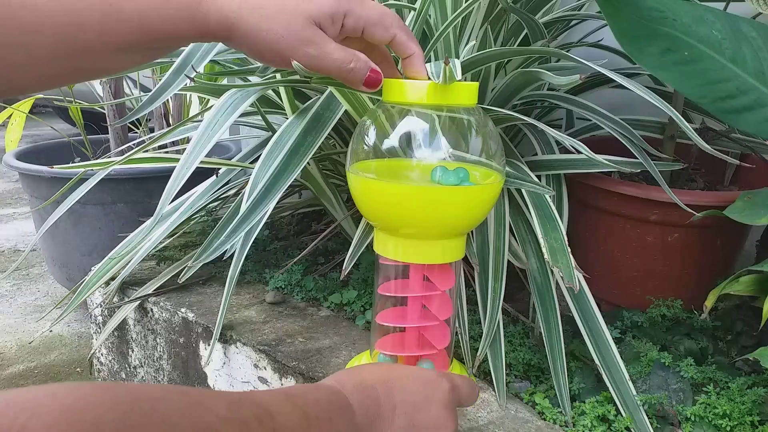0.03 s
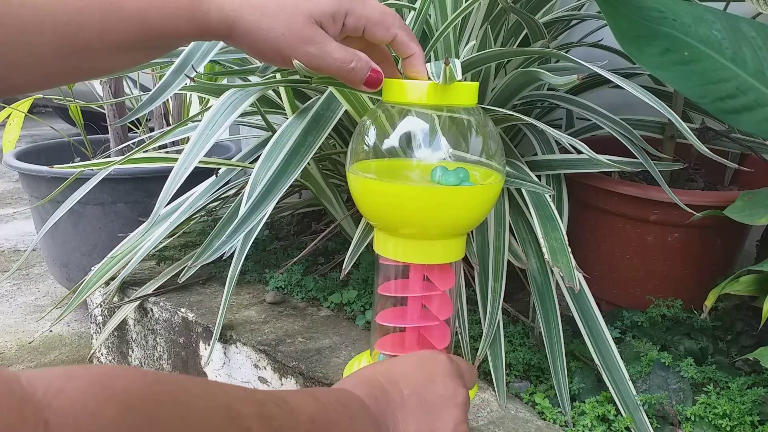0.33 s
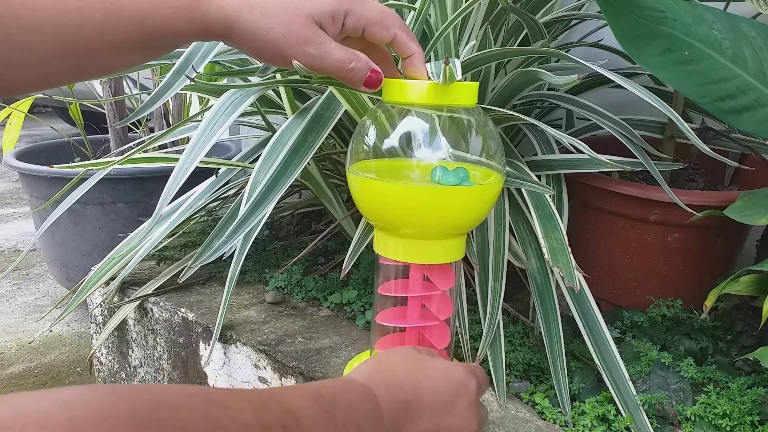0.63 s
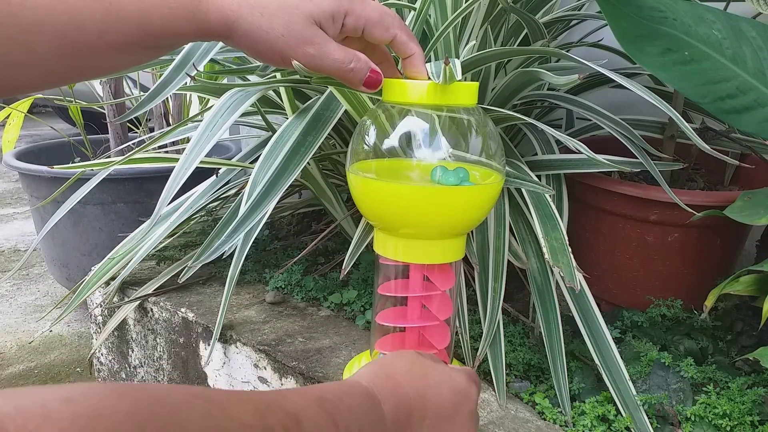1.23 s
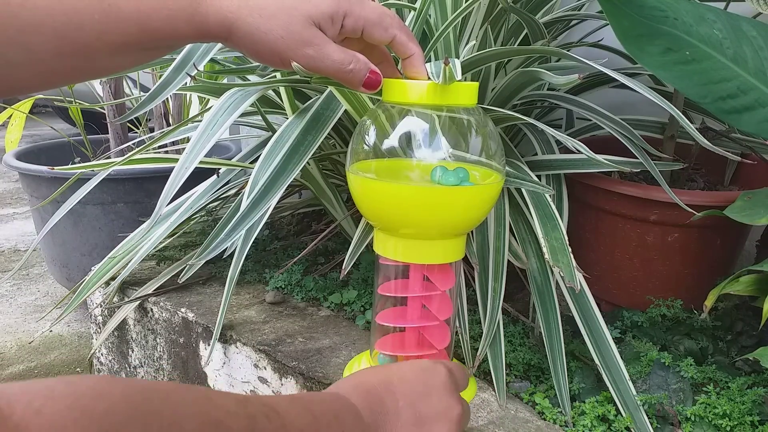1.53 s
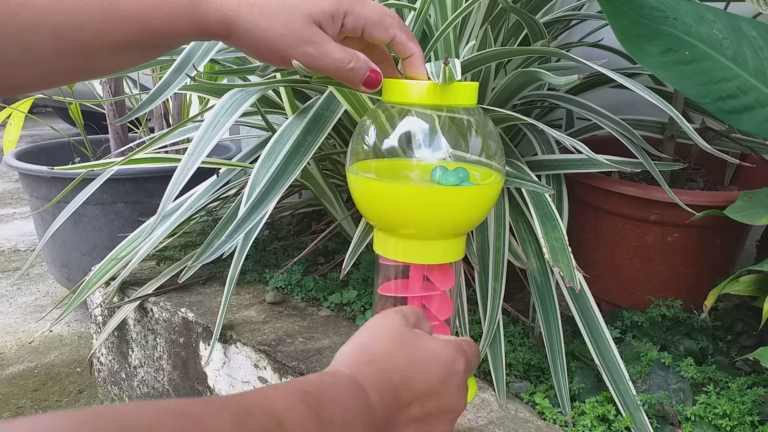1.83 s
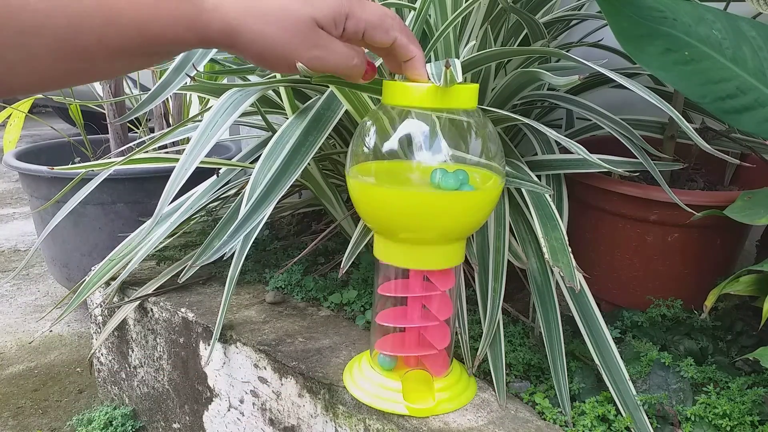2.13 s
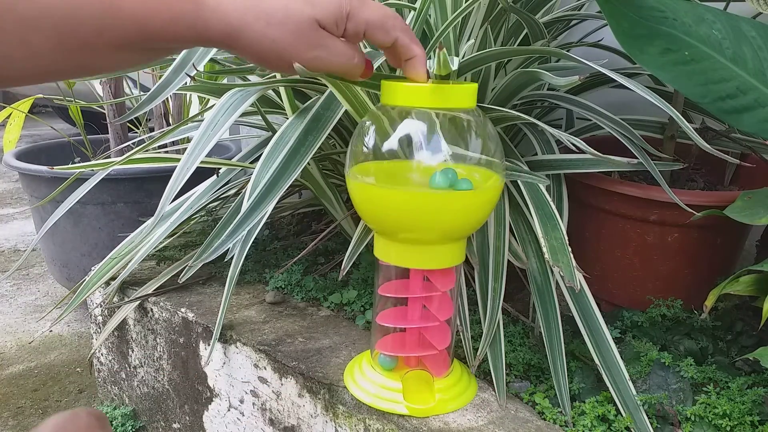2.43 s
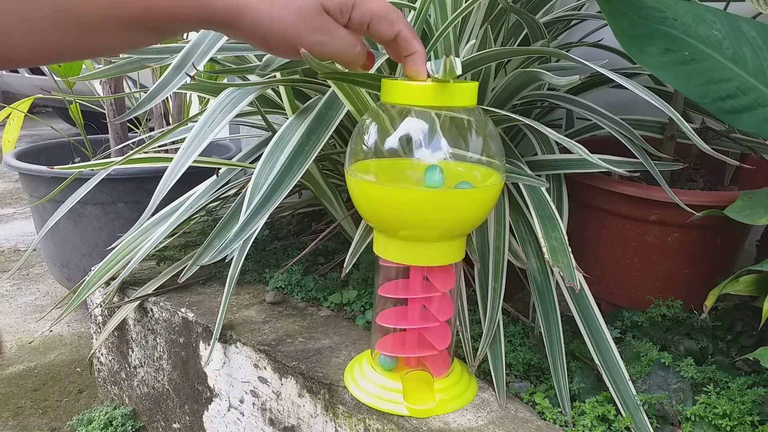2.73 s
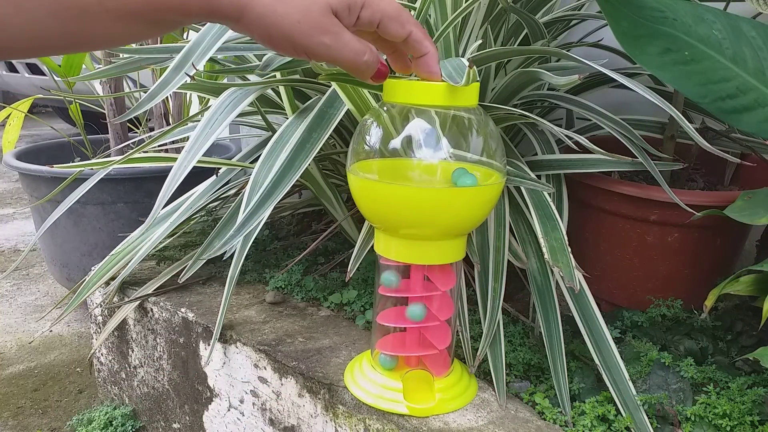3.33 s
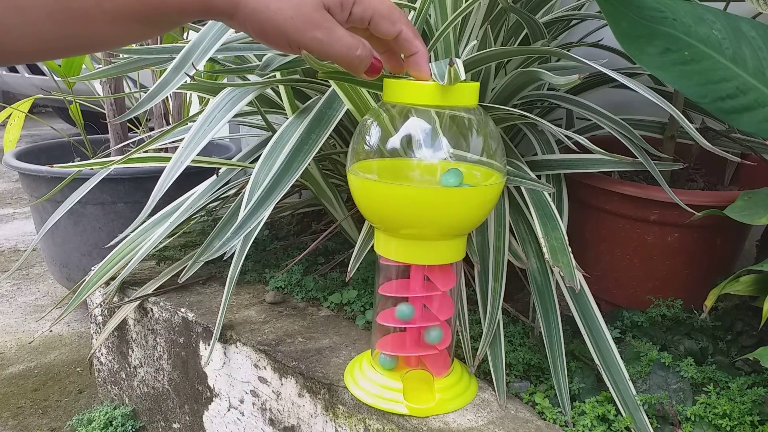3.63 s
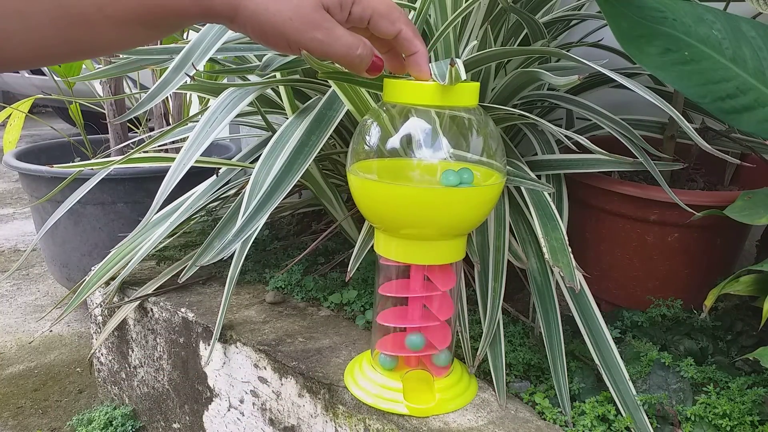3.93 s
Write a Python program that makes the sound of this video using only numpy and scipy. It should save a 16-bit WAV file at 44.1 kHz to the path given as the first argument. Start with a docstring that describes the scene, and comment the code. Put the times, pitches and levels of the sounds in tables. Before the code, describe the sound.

Marbles rattle in a plastic marble run, heard close outdoors: a few sharp clacks, a quiet pause with faint distant chirps, then busy clattering and rolling with soft thuds, lighter ticks down a spiral and several hard knocks.

```python
"""A marble clacks into the tray of a plastic marble tower, and a hand fiddles there.
Then marbles clatter into the bowl on top and circle it; one ticks down the spiral and knocks into
the bottom of the tube. Each hit or tiny rolling bump makes the plastic ring with many short tones.
Fingers rub the rim, and the toy thuds as it rocks under the hand.
Behind it, outdoors, are a few faint falling swishes, far calls and a low rumble."""
import sys
import numpy as np
from scipy import signal
from scipy.fft import rfft, irfft
from scipy.io import wavfile
from scipy.ndimage import uniform_filter1d

SR = 44100
rng = np.random.default_rng(int(sys.argv[2]) if len(sys.argv) > 2 else 0)


def store_pcm(level_fs):
    """Save levels as 16-bit WAV."""
    pcm = np.round(np.clip(level_fs, -1, 1) * 32767).astype(np.int16)
    wavfile.write(sys.argv[1], SR, np.atleast_2d(pcm).T)


N = 176400
TIME = np.arange(N) / SR
RING_TIME = TIME[:7000]

# Marble and fingers hit the tray: start_s, low_db, middle_db, high_db
TRAY_HITS = [(0.0935, -28, -26.5, -32.5), (0.1328, -28, -22, -34), (0.1685, -23.5, -17.5, -27),
             (0.198, -33, -25.5, -41), (0.2325, -33, -26, -39), (0.3855, -33.5, -32, -45),
             (0.539, -48.5, -43, -64), (0.669, -49, -50.5, -77), (0.716, -48, -53, -60),
             (0.878, -47, -46.5, -64), (1.471, -38, -43, -65), (2.046, -76, -44.5, -31)]
# Marbles hit the bowl and the spiral: start_s, low_db, middle_db, ping_hz
BOWL_HITS = [(2.206, -28, -28.5, 3240), (2.2131, -22.5, -22, 3320), (2.2399, -25, -19.5, 5040),
             (2.2439, -35, -18, 3262), (2.266, -25, -17.5, 4620), (2.2875, -24.5, -16.5, 4250),
             (2.302, -31, -31, 3133), (2.384, -32, -32.5, 3650), (2.4175, -23, -21.5, 1804),
             (2.429, -25, -14, 4511), (2.438, -23.5, -29, 4520), (2.469, -28.5, -26.5, 3585),
             (2.5208, -31, -20, 4349), (2.542, -39, -23, 1877), (2.5505, -19, -17.5, 2887),
             (2.563, -36, -16, 5060), (2.567, -29, -29, 4120), (2.594, -29.5, -23, 3660),
             (2.6137, -42, -26, 5100), (2.647, -39, -29.5, 4440), (2.678, -45, -27, 2970),
             (2.769, -29.5, -34, 4200), (2.811, -32, -20.5, 4780), (2.84, -34, -27.5, 4680),
             (2.901, -52, -30.5, 4931)]
SPIRAL_HITS = [(2.955, -40.5, -27, 4400), (3.0045, -37, -27, 5577), (3.06, -38.5, -25.5, 4270),
               (3.122, -37.5, -26.5, 3390), (3.154, -42.5, -30, 3180), (3.268, -40.5, -36.5, 4300),
               (3.362, -39.5, -27, 5480), (3.42, -36.5, -23, 4380), (3.4775, -45, -27, 4700),
               (3.51, -41, -33.5, 4700), (3.675, -55, -34, 3580), (3.7055, -48, -26.5, 4630),
               (3.754, -39, -24, 4020), (3.848, -45, -29.5, 3180)]
# A marble knocks in the tube: start_s, low_db, middle_db, high_db, choke_s
TUBE_HITS = [(3.554, -20, -15, -18.5, 0.028), (3.605, -24, -23, -27, 0.096),
             (3.613, -30, -20, -21.5, 0.091), (3.789, -25, -19, -22.5, 0.16), (3.806, -32, -27, -27, 0.12),
             (3.83, -36, -28, -40, 0.17), (3.91, -27.5, -21.5, -25, .03)]
# Borders of a hit's low, middle and high bands: edge_hz
BAND_EDGES_HZ = [0, 2200, 7500, 17000]
# Glass rolls on plastic, in the tray, then in bowl and spiral: time_s, level_db
ROLLING_LEVELS = [(.07, -51), (.12, -36), (.215, -39), (2.23, -34.5), (2.31, -28.5), (2.39, -37),
                  (2.53, -26), (2.75, -36), (2.93, -36), (3.38, -41.5), (3.54, -31), (3.73, -38),
                  (3.86, -33.5), (4.0, -36.5)]
# Level of touches between marbles, relative to the rolling: low_db, middle_db
JOSTLE_DB = [-26, 3]
# Clear tones that stand out in each part's ring: pitch_hz, boost_db
TRAY_TONES = [(1270, 14), (1345, 13.5), (2990, 15.5), (3600, 8.5)]
BOWL_TONES = [(420, 13.5), (1290, 7.6), (1870, 6.5), (5000, 7.1)]
SPIRAL_TONES = [(3230, 20.6), (4320, 20), (5150, 16), (5510, 16.7)]
TUBE_TONES = [(1110, 9.9), (4630, 20)]
ROLL_TONES = [(1320, 10), (2980, 21)]
# How strongly each part rings, from bass to treble: pitch_hz, level_db
TRAY_COLOUR = [(300, -33), (1100, 5), (1900, 3.5), (3300, 14.5), (5000, 7.5), (8000, 4), (15500, -7.5)]
BOWL_COLOUR = [(300, -16.5), (620, -15), (950, -6), (4700, 3), (7000, -4.5), (9000, -20), (12500, -16.5),
               (15500, -21.5)]
SPIRAL_COLOUR = [(300, -14.5), (700, -16.5), (1300, -3), (2600, -14), (4800, -4), (9000, -12.5),
                 (15500, -11)]
TUBE_COLOUR = [(300, -6), (650, -6.5), (1050, 8), (1800, -7.5), (4500, -2.5), (7000, -1.5), (9000, -9.5),
               (15500, -9.5)]
ROLL_COLOUR = [(250, -5.5), (620, -9.5), (1150, 4.5), (1650, -2), (2500, -0.5), (4600, -1.5), (9000, -14),
               (15500, -25)]
# Thuds of the rocking toy: start_s, level_db, pitch_hz, fade_s
THUDS = [(2.237, -25, 144, 0.11), (2.452, -24.5, 139, 0.14), (2.769, -29, 140, 0.096),
         (2.877, -31.5, 76, 0.32), (2.924, -31.5, 223, 0.088)]
# Fingers rub the rim: centre_s, half_length_s, level_db, lower_edge_hz
RUBS = [(1.654, 0.013, -50, 1990), (2.076, 0.015, -39, 4560)]
# Falling swishes and far calls: centre_s, half_length_s, pitch_hz, level_db
SWISHES = [(1.027, 0.06, 5220, -53.5), (1.105, 0.06, 3700, -47.5), (1.335, 0.035, 6250, -57),
           (1.945, 0.048, 6570, -57.5), (2.169, 0.038, 3780, -44)]
FAR_CALLS = [(1.775, 0.034, 3950, -60.5), (1.867, 0.048, 2150, -62)]
# Outdoor rumble and hiss, from bass to treble: pitch_hz, level_db
AIR_COLOUR = [(25, 7), (97, 3), (575, -11), (2410, -19), (5570, -22), (7920, -28), (9320, -36.5),
              (16000, -35)]


def plastic_part(colour, tones, fade_s, clear_fade_s, damping, count=520):
    """Plastic rings with a crowd of short tones and a few clear ones. Fade times apply at 3000 Hz."""
    crowd_hz = 250 + 16000 * ((np.arange(count) + rng.random(count)) / count) ** 1.4
    clear_hz, boost_db = np.transpose(tones)
    hz = np.r_[crowd_hz, clear_hz]
    spacing_gain = np.sqrt(np.gradient(crowd_hz) / np.mean(np.diff(crowd_hz)))
    gain = colour_gain(colour, hz) * np.r_[spacing_gain, from_db(boost_db)]
    fades = np.r_[fade_s * np.exp(.3 * rng.standard_normal(count)), np.full(len(tones), clear_fade_s)]
    fades *= (hz / 3000) ** -damping  # higher tones die sooner
    rings = gain[:, None] * np.cos(2 * np.pi * hz[:, None] * RING_TIME) * fade(fades[:, None])
    return hz, rings, count


def strike(hits, part, choke_s=np.inf):
    """Each hit rings its own mix of tones; its hardness sets the low, middle and high levels."""
    hz, rings, first_clear = part
    hits, out = np.array(hits), np.zeros(N)
    strengths = rng.standard_normal((len(hits), len(hz)))
    clear = strengths[:, first_clear:]
    strengths[:, first_clear:] = np.sign(clear) * (1 + np.abs(clear)) / 2  # clear tones always sound
    spread = 1 - np.exp(-RING_TIME / 0.0012)  # the blow takes time to spread through the plastic
    sounds = 0
    for column, (low, high) in enumerate(zip(BAND_EDGES_HZ, BAND_EDGES_HZ[1:]), start=1):
        band = (hz >= low) & (hz < high)
        ring = strengths[:, band] @ rings[band] * spread
        onset = ring[:, :int(.008 * SR)]
        sounds = sounds + ring / rms(onset) * from_db(hits[:, [column]])
    for start_s, sound in zip(hits[:, 0], sounds * fade(choke_s)):
        add(out, start_s, sound)
    return out


def marble_clicks(hits, part, treble_db=-9.5, ping_db=-4, ping_fade_s=0.14):
    """A glass marble hits the wall: a plastic click, and a ping whose pitch depends on the spot."""
    hits = np.array(hits)
    out = strike(np.c_[hits[:, :3], hits[:, 2] + treble_db], part)
    for start_s, _, middle_db, hz in hits:
        ping = np.sin(2 * np.pi * hz * RING_TIME) * fade(ping_fade_s)
        add(out, start_s, from_db(middle_db + ping_db) * ping)
    return out


def jostle(part, count=24, from_s=2.25, to_s=2.92):
    """Marbles touch lightly at uneven times, harder when they roll faster."""
    start_s = from_s + (to_s - from_s) * (np.arange(count) + rng.random(count)) / count
    rolling_db = np.interp(start_s, *np.transpose(ROLLING_LEVELS))
    ping_hz = rng.choice(np.array(BOWL_HITS)[:, 3], count)
    return marble_clicks(np.c_[start_s, rolling_db[:, None] + JOSTLE_DB, ping_hz], part)


def tube_knocks(part):
    """The marble knocks at the bottom of the tube and stays against the wall, choking its ring."""
    return strike(TUBE_HITS, part, choke_s=np.array(TUBE_HITS)[:, [4]])


def rolling(part, spots=6, bumps_per_s=800, changes_per_s=22, rest_from_s=.235, rest_to_s=2.215):
    """Tiny random bumps along the track keep the plastic ringing, except while the marbles rest."""
    hz, rings, _ = part
    out = 0
    for spot_ring in rng.standard_normal((spots, len(hz))) @ rings:
        bumps = (rng.random(N) < bumps_per_s / spots / SR) * rng.choice([-1, 1], N)
        # The marble passes spots that favour different tones.
        nearness = np.interp(TIME * changes_per_s, np.arange(400), rng.uniform(-1, 1, 400))
        scatter_db = 4 * np.minimum(rng.exponential(1, N), 4)
        bumps = bumps * from_db(scatter_db + 10.5 * nearness)
        out = out + signal.oaconvolve(bumps, spot_ring)[:N]
    moving = uniform_filter1d(1.0 * ((TIME < rest_from_s) | (TIME > rest_to_s)), size=800)
    level_db = np.interp(TIME, *np.transpose(ROLLING_LEVELS), left=-np.inf)
    return out / rms(out) * moving * from_db(level_db)


def thuds(puff_hz=380, puff_fade_s=0.3, puff_db=-7, attack_s=0.0013):
    """The hand rocks the toy: a low tone that dies quickly and a puff of dull noise."""
    out = np.zeros(N)
    attack = 1 - np.exp(-RING_TIME / attack_s)
    for start_s, db, hz, fade_s in THUDS:
        noise = low_pass(rng.standard_normal(len(RING_TIME)), puff_hz)
        puff = from_db(puff_db) * noise / rms(noise) * fade(puff_fade_s)
        swing = np.sin(2 * np.pi * hz * RING_TIME) * fade(fade_s)
        add(out, start_s, from_db(db) * (swing + puff) * attack)
    return out


def finger_rubs():
    """Fingers rub the rim, making short, soft, bright hisses."""
    out = 0
    for centre_s, half_s, db, hz in RUBS:
        noise = rng.standard_normal(N)
        octave_band = signal.butter(2, [hz, 2 * hz], "band", fs=SR, output="sos")
        hiss = signal.sosfilt(octave_band, noise) + noise / 5
        swell = np.exp(-.5 * ((TIME - centre_s) / half_s) ** 2)
        out = out + from_db(db) * hiss / rms(hiss) * swell
    return out


def yard_echo(sound, build_s=0.026, fade_s=0.098, level_db=-19, cutoff_hz=6700):
    """Ground, pots and walls scatter the sound into a short, dull echo."""
    build_up = 1 - np.exp(-(RING_TIME / build_s) ** 2)
    tail = low_pass(rng.standard_normal(len(RING_TIME)), cutoff_hz) * fade(fade_s) * build_up
    tail /= np.sqrt(np.sum(tail ** 2))
    return from_db(level_db) * signal.oaconvolve(sound, tail)[:N]


def swishes(count=5, steepest_octaves_per_s=2.6, scatter_octaves=0.2, waver_hz=75):
    """Each swish is a cluster of thin airy whistles that swell, sink in pitch, level off and fade."""
    out, t = np.zeros(N), np.arange(-SR // 4, SR // 4) / SR
    for centre_s, half_s, hz, db in SWISHES:
        fall_octaves = steepest_octaves_per_s * half_s * np.tanh(t / half_s)
        for lag, detune in zip(rng.uniform(-0.42, 0.5, count), np.linspace(-1, 1, count)):
            pitch_hz = hz * 2 ** (scatter_octaves * detune - fall_octaves)
            waver = low_pass(rng.standard_normal(len(t)), waver_hz, order=1)
            whistle = waver * np.cos(2 * np.pi * np.cumsum(pitch_hz) / SR)
            swell = np.exp(-(t / half_s - lag) ** 2)
            add(out, centre_s + t[0], from_db(db) * whistle / rms(whistle) / np.sqrt(count) * swell)
    return out


def far_calls(waver_hz=75):
    """Each call, probably a bird's, is one thin wavering note that swells and fades."""
    out = 0
    for centre_s, half_s, hz, db in FAR_CALLS:
        note = low_pass(rng.standard_normal(N), waver_hz, order=1) * np.cos(2 * np.pi * hz * TIME)
        swell = np.exp(-((TIME - centre_s) / half_s) ** 2)
        out = out + from_db(db) * note / rms(note) * swell
    return out


def outdoor_air(level_db=-49, start_s=0.069, rise_s=0.0017):
    """Far rumble and hiss come in quickly and stay steady."""
    hz = np.arange(N // 2 + 1) * SR / N
    noise = irfft(rfft(rng.standard_normal(N)) * colour_gain(AIR_COLOUR, hz), N)
    return from_db(level_db) * noise / rms(noise) * np.clip((TIME - start_s) / rise_s, 0, 1)


def from_db(db):
    """Turn decibels into a gain to multiply by."""
    return 10 ** (np.asarray(db) / 20)


def rms(sound):
    """A sound's average strength (root mean square)."""
    return np.sqrt(np.mean(sound ** 2, axis=-1, keepdims=True) + 1e-20)


def colour_gain(colour, hz):
    """Read a colour table's gain at the given pitches."""
    table_hz, db = np.transpose(colour)
    return from_db(np.interp(np.log(np.maximum(hz, 1)), np.log(table_hz), db))


def low_pass(sound, hz, order=2):
    """Soften everything above the given pitch."""
    return signal.sosfilt(signal.butter(order, hz, fs=SR, output="sos"), sound)


def fade(fade_s):
    """A curve that drops by 60 dB in fade_s seconds."""
    return np.exp(-np.log(1000) * RING_TIME / fade_s)


def add(out, start_s, sound):
    """Mix a sound in at the given time."""
    i = max(int(start_s * SR), 0)
    out[i:i + len(sound)] += sound[:max(N - i, 0)]


def scene():
    """Marbles hit and roll on the tower; the echo, the hand and the outdoors join in."""
    bowl = plastic_part(BOWL_COLOUR, BOWL_TONES, fade_s=0.049, clear_fade_s=0.054, damping=0.049)
    tray = plastic_part(TRAY_COLOUR, TRAY_TONES, fade_s=0.041, clear_fade_s=0.042, damping=0.46)
    toy = strike(TRAY_HITS, tray) + marble_clicks(BOWL_HITS, bowl) + jostle(bowl)
    spiral = plastic_part(SPIRAL_COLOUR, SPIRAL_TONES, fade_s=0.075, clear_fade_s=0.053, damping=0.47)
    toy += marble_clicks(SPIRAL_HITS, spiral, treble_db=-8.5, ping_db=-3.5)
    tube = plastic_part(TUBE_COLOUR, TUBE_TONES, fade_s=0.12, clear_fade_s=0.043, damping=0.12)
    toy += tube_knocks(tube)
    track = plastic_part(ROLL_COLOUR, ROLL_TONES, fade_s=0.056, clear_fade_s=0.027, damping=0.029)
    toy += rolling(track)
    return (toy + yard_echo(toy) + finger_rubs() + thuds() + swishes() + far_calls() + outdoor_air())[None]


def record(dry):
    """Trim the deepest bass and the highest treble, and stop peaks at full scale."""
    bass_cut = signal.butter(4, 54.6, "high", fs=SR, output="sos")
    treble_cut = signal.ellip(12, .1, 80, 15900, fs=SR, output="sos")
    return np.clip(signal.sosfilt(treble_cut, signal.sosfilt(bass_cut, dry)), -1, 1)


dry = scene()
out = record(dry)
store_pcm(out)
```